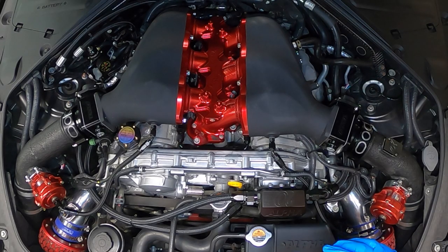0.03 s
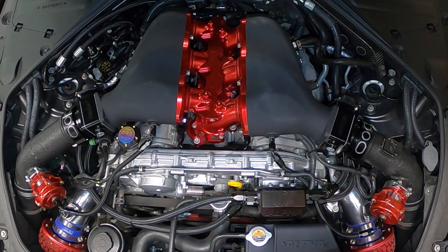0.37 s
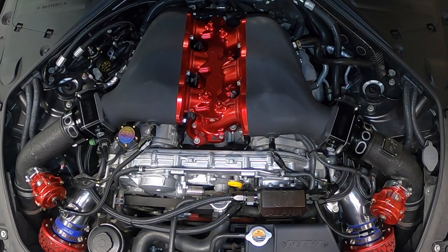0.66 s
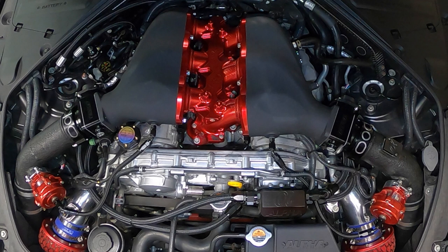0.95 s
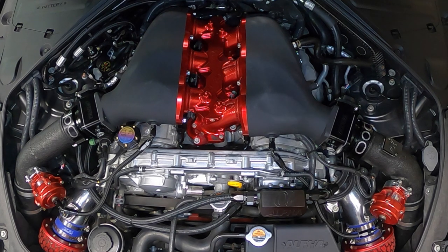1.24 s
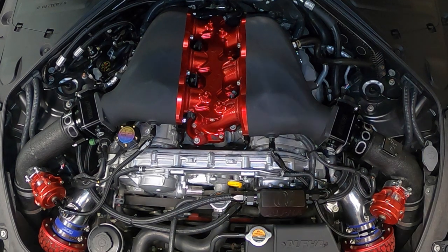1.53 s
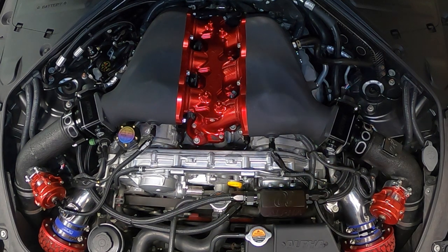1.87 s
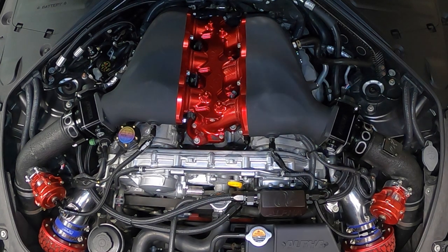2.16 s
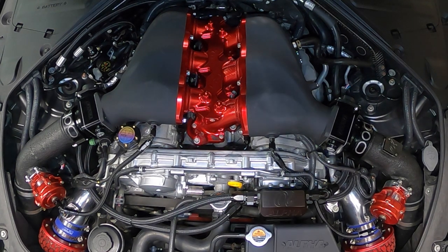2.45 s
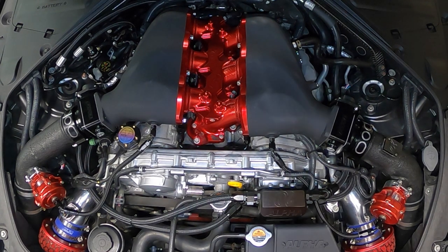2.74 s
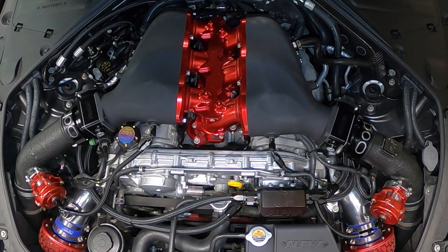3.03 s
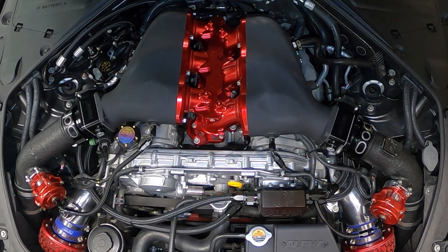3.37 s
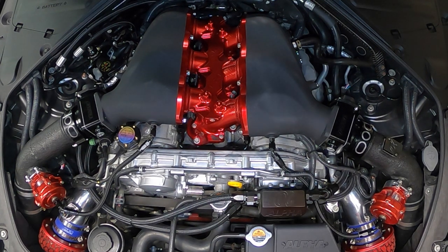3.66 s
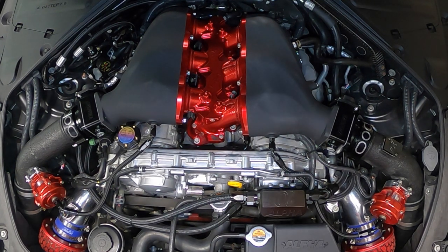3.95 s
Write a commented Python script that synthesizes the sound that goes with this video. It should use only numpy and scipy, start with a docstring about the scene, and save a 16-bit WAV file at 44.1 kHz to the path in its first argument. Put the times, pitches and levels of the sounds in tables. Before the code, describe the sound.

A cloth wipes softly in a car's engine bay, with dull bumps and small clicks.

```python
"""A garage, beside an open engine bay: someone moves about with a wiping cloth.
The cloth swishes in short strokes as its fibres slide and snag. A hollow body rings with dull thumps
when bumped and groans when rubbed; rubbed parts squeak briefly and small hard parts click.
Under it all the room rumbles and the ventilation hums faintly. The walls add a short, dull tail."""
import sys
import numpy as np
from scipy import signal
from scipy.fft import rfft, irfft
from scipy.io import wavfile

SR = 44100
rng = np.random.default_rng(int(sys.argv[2]) if len(sys.argv) > 2 else 0)


def materialize(psi):
    """Save the field psi as 16-bit PCM at rate SR to the path in sys.argv[1].

    A 1-D psi becomes a single channel; in a 2-D psi each row is a channel.
    """
    bounded = np.clip(np.atleast_2d(psi).T, -1, 1)
    quanta = np.round(bounded * 32767).astype(np.int16)
    wavfile.write(sys.argv[1], SR, quanta)


N = 176400
TIME_S, BIN_HZ = np.arange(N) / SR, np.fft.rfftfreq(N, 1 / SR)


def from_db(db):
    """Decibels to gain."""
    return 10 ** (np.asarray(db) / 20)


def rms_one(x):
    """Scale to unit power."""
    return x / np.sqrt(np.mean(x ** 2) + 1e-20)


def pan(db):
    """Left and right gains; positive dB leans left."""
    return from_db(np.array([[db], [-db]]) / 2)


def equalise(x, curve):
    """Apply an EQ curve drawn on a log-frequency axis."""
    hz, db = np.transpose(curve)
    return irfft(rfft(x) * from_db(np.interp(np.log(BIN_HZ + 1e-9), np.log(hz), db)), N)


def colour(x, curve):
    """EQ a noise and bring it to unit power."""
    return rms_one(equalise(x, curve))


def lowpass(x, hz, order):
    """Butterworth low-pass."""
    return signal.sosfilt(signal.butter(order, hz, fs=SR, output="sos"), x + 1e-18)


def resonance(x, hz, width):
    """Band-pass with gain 1 at its peak; width as a share of its pitch."""
    r = np.exp(-np.pi * hz * width / SR)
    feedback = [1, -2 * r * np.cos(2 * np.pi * hz / SR), r * r]
    return signal.lfilter(np.array([1, 0, -1]) * (1 - r * r) / 2, feedback, x + 1e-18)


def focus(x, hz, width):
    """Two resonances in series, for steeper skirts."""
    return resonance(resonance(x, hz, width), hz, width)


def envelope(start, length, attack, release):
    """Smooth rise centred on the start, hold, dying release; all in seconds."""
    t = TIME_S - start
    rise = np.sin(np.clip(t / attack + .5, 0, 1) * np.pi / 2) ** 2
    return rise * np.exp(-np.maximum(t - length, 0) / release)


def drift(rate_hz):
    """Smooth random wander of spread 1."""
    return rms_one(irfft(rfft(rng.standard_normal(N)) / (1 + (BIN_HZ / rate_hz) ** 2), N))


def grains(per_s, spread_db):
    """Random tiny impacts, all one size at a spread of 0 dB; unit power."""
    sizes = from_db(spread_db * np.minimum(rng.exponential(1, N), 4)) * rng.choice([-1, 1], N)
    return rms_one(sizes * (rng.random(N) < per_s / SR))


# Stereo width, as EQ on the side signal: freq_hz, gain_db
SIDE_EQ = [(50, -23.5), (260, -7), (1000, -5), (7000, -2), (12000, -0.5)]
def spread(mid, side):
    """Stereo from two unrelated signals, wider towards the treble."""
    side = equalise(side, SIDE_EQ)
    return np.array([mid + side, mid - side])


def noise():
    """Stereo noise, close to white."""
    return spread(*rng.standard_normal((2, N)))


# Tone of the room's air: freq_hz, gain_db
RUMBLE_EQ = [(24, -7), (45, 4), (140, -14.5), (235, -20.5), (320, -24), (500, -32), (800, -40.5),
             (1250, -32), (1900, -48), (3000, -51), (7000, -55), (10000, -66), (15000, -69)]
# Fader ride on the rumble's bass: time_s, gain_db
BASS_RIDE = [(.35, -3.5), (.55, -0.5), (1.1, 1.5), (2.4, -0.5), (3.0, -11), (3.23, 4), (3.42, -18.5),
             (3.52, -2), (3.9, -0.5)]
def room_rumble():
    """A bed of dark air noise whose bass swells and dips."""
    split_hz = 182
    air = colour(noise(), RUMBLE_EQ)
    bass = irfft(rfft(air) / (1 + (BIN_HZ / split_hz) ** 2) ** 2, N)
    swell_db = np.interp(TIME_S, *np.transpose(BASS_RIDE)) + 3 * drift(rate_hz=6.5)
    return from_db(-52.5) * (air + bass * (from_db(swell_db) - 1)) * pan(db=0.5)


# Tones of the ventilation: pitch_hz, level_db
HUM_TONES = [(232, -71), (479.7, -83)]
def ventilation_hum():
    """Faint tones, each wavering in level and phase."""
    out = 0
    for hz, db in HUM_TONES:
        waver = from_db(2.5 * drift(rate_hz=9.7))
        tone = np.sin(2 * np.pi * hz * TIME_S + .5 * drift(rate_hz=12))
        out = out + from_db(db) * rms_one(waver * tone)
    return out


def garage_reverb(x):
    """A dull, diffuse tail from the walls."""
    t60_s, predelay_s = 0.45, 0.008
    decay = from_db(-60 * TIME_S / t60_s) * (TIME_S > predelay_s)
    tail = lowpass(noise() * decay, hz=4040, order=1)[:, :SR]
    return signal.fftconvolve(x, rms_one(tail) / np.sqrt(SR), axes=1)[:, :N]


def cloth_crackle():
    """Sparse bright ticks as the cloth is handled lightly."""
    decay_s = 0.0019
    impacts = np.abs(grains(per_s=160, spread_db=4.5))
    puffs = signal.lfilter([1], [1, -np.exp(-1 / (decay_s * SR))], impacts + 1e-18)
    ticks = lowpass(resonance(puffs * noise(), hz=6800, width=0.42), hz=8000, order=8)
    return from_db(-86) * envelope(start=1.89, length=0.68, attack=0.023, release=0.023) * rms_one(ticks)


# Rubbed parts that sing: start_s, length_s, level_db, pitch_hz
SQUEAK_CUES = [(0.112, 0.25, -85.5, 4150), (0.617, 0.14, -56, 181), (1.194, 0.03, -59.5, 511),
               (1.203, 0.0091, -63, 1505), (2.993, 0.085, -78, 5750), (2.995, 0.087, -75, 3350)]
def squeaks():
    """For a moment the slips of a rubbed part fall into one pitch."""
    slips, out = noise(), 0
    for start, length, db, hz in SQUEAK_CUES:
        tone = rms_one(focus(slips, hz, width=0.13))
        out = out + from_db(db) * envelope(start, length, attack=0.0045, release=0.018) * tone
    return out


# Dry scuffs: start_s, length_s, level_db
SCUFF_CUES = [(1.165, 0.019, -60), (1.38, 0.019, -66.5), (1.459, 0.031, -63.5), (1.993, 0.054, -74),
              (3.635, 0.064, -68)]
# Their mid-heavy tone: freq_hz, gain_db
SCUFF_EQ = [(250, -18.5), (560, 9), (850, 10.5), (1400, 8), (2100, 0), (6000, -29.5)]
def scuffs():
    """Short gritty scrapes at the moments of contact."""
    level = sum(from_db(db) * envelope(start, length, attack=0.01, release=0.013)
                for start, length, db in SCUFF_CUES)
    grit = spread(grains(per_s=1200, spread_db=-0.5), rng.standard_normal(N))
    return level * colour(grit, SCUFF_EQ)


# Taps on small hard parts: start_s, level_db, pitch_hz
CLICK_CUES = [(1.1613, -49, 2430), (1.166, -48.5, 6800), (1.461, -51.5, 4530), (1.478, -42.5, 4560),
              (2.9178, -53, 4240), (2.9512, -53.5, 7100), (2.994, -49, 3220), (3.016, -56, 5600),
              (3.057, -52.5, 3540), (3.0678, -54, 3340), (3.072, -55.5, 7200), (3.155, -52.5, 3150)]
# Resonances all the parts share: pitch_hz, gain_db, width_ratio (bandwidth over pitch)
PART_MODES = [(1295, 5.5, 0.073), (2500, -2.5, 0.08), (4770, -7.5, 0.068), (7200, -13, 0.22)]
# Tone of the crack: freq_hz, gain_db
CRACK_EQ = [(400, 13.5), (4700, 12.5), (7400, 11), (9000, -8), (14000, -47)]
def clicks():
    """A sharp tap rings a small part; a crack and a faint tail go with it."""
    crack, out = colour(noise(), CRACK_EQ), 0
    for start, db, hz in CLICK_CUES:
        tap = 1. * (np.arange(N) == int(start * SR))
        shared_ring = sum(from_db(mode_db) * resonance(tap, mode_hz, width) * (-1) ** k
                          for k, (mode_hz, mode_db, width) in enumerate(PART_MODES))
        own_ring = 2 * from_db(-1) * resonance(tap, hz, width=0.14)
        ring = lowpass(shared_ring + own_ring, hz=8000, order=8)
        snap = from_db(-21.5) * envelope(start, 0, attack=.0004, release=0.0019)
        tail = from_db(-17.5) * envelope(start, 0, attack=.0004, release=0.0075)
        out = out + from_db(db) * (ring / np.abs(ring).max() + (snap + tail) * crack)
    return out


# Modes of the hollow body: pitch_hz, gain_db, t60_s
BODY_MODES = [(62, 2.5, 0.14), (111.5, -0.5, 0.13), (126, -3.5, 0.18), (207, 2.5, 0.093), (252, -2.5, 0.25),
              (274.4, -3, 0.27), (378.4, -9.5, 0.11), (511, -8.5, 0.087), (556, -9.5, 0.099),
              (767, -12, 0.16), (1426, -11.5, 0.061)]
def body_ring():
    """The hollow body's dying ring after a single tap."""
    t = TIME_S[:SR // 2]
    return sum(from_db(db - 60 * t / t60) * np.cos(2 * np.pi * hz * t) for hz, db, t60 in BODY_MODES)


# Rubs on the body: start_s, length_s, level_db, pitch_hz
RUB_CUES = [(1.164, 0.047, -47.5, 252), (1.265, 0.16, -57, 268), (1.403, 0.11, -55.5, 282),
            (1.452, 0.06, -44, 134.3), (1.585, 0.064, -51.5, 72), (1.684, 0.064, -58, 264),
            (1.919, 0.17, -47, 88), (1.964, 0.06, -51, 226), (2.065, 0.076, -53.5, 112.5)]
def rubs():
    """Dense stick and slip makes the body groan, with some direct friction mixed in."""
    slips_per_s, width = 1300, 0.45
    slips = spread(grains(slips_per_s, spread_db=0), from_db(-7.5) * grains(slips_per_s, spread_db=0))
    ringing, out = signal.fftconvolve(slips, body_ring()[None], axes=1)[:, :N], 0
    for start, length, db, hz in RUB_CUES:
        friction = rms_one(focus(slips, hz, width))
        hollow = rms_one(resonance(resonance(ringing, hz, width), hz, width=1.93))
        groan = rms_one(hollow + from_db(-6.5) * friction)
        out = out + from_db(db) * envelope(start, length, attack=0.013, release=0.022) * groan
    return out


# Bumps on the body: start_s, level_db (of half the peak), pitch_hz
BUMP_CUES = [(1.163, -40.5, 215), (1.166, -39.5, 62), (1.204, -41.5, 122.5), (1.219, -44.5, 235),
             (1.403, -44, 263), (1.411, -43.5, 120), (1.429, -49, 292), (1.475, -49, 143), (1.573, -47, 71),
             (1.578, -57, 513), (1.975, -40, 100.5), (2.002, -50, 264), (2.021, -33, 85.3),
             (2.028, -46.5, 211), (2.036, -52, 420), (3.673, -57, 910)]
def bumps():
    """Soft contacts set the body ringing, each around its own pitch."""
    out, ring = np.zeros(N + SR), body_ring()
    for start, db, hz in BUMP_CUES:
        thump = focus(ring, hz, width=0.6)
        onset = int(start * SR)
        out[onset:onset + len(thump)] += 2 * from_db(db) * thump / np.abs(thump).max()
    return out[:N]


# Wiping strokes: start_s, length_s, swish_gain_db, sheen_gain_db, low_cut_hz
STROKE_CUES = [(0.0, 0.08, -73, -92, 1510), (0.112, 0.29, -84, -100, 2500),
               (0.565, 0.095, -67.5, -87, 1400), (0.631, 0.012, -72.5, -97, 1420),
               (0.679, 0.14, -67.5, -82, 710), (0.802, 0.0057, -67, -80, 2930),
               (0.884, 0.046, -66, -80, 3630), (0.912, 0.18, -77.5, -95.5, 3770),
               (1.174, 0.057, -67.5, -95, 700), (1.184, 0.0068, -77, -66.5, 4020),
               (1.249, 0.11, -73, -85.5, 3720), (1.95, 0.079, -75.5, -89, 3700),
               (2.302, 0.05, -76.5, -87, 4040), (2.43, 0.16, -85.5, -100, 3550),
               (2.792, 0.15, -80.5, -96, 2000), (2.946, 0.14, -77.5, -87, 2200),
               (3.118, 0.15, -77.5, -105, 2200), (3.525, 0.2, -71.5, -92, 2000),
               (3.799, .12, -73, -98, 2320), (3.937, .06, -71.5, -88, 2800)]
# Tone of the sliding fibres: freq_hz, gain_db
FIBRE_EQ = [(700, -3.5), (1400, 1.5), (2100, -4.5), (3100, -0.5), (4700, 2), (6200, 0), (7500, -1),
            (9000, -10.5), (12000, -26.5)]
# Sheen, the fine hiss on top: freq_hz, gain_db
SHEEN_EQ = [(5000, -46), (7000, 12.5), (10000, 14), (13000, 4), (15500, -7.5)]
def cloth_strokes():
    """Sliding fibres hiss and snag; each stroke has its own low cut, and the pressure flutters."""
    fibres = colour(noise() + from_db(-2.5) * grains(per_s=970, spread_db=-10.5), FIBRE_EQ)
    sheen, out = colour(noise(), SHEEN_EQ), 0
    for start, length, swish_db, sheen_db, low_cut_hz in STROKE_CUES:
        swish = signal.sosfilt(signal.butter(3, low_cut_hz, "high", fs=SR, output="sos"), fibres)
        pressure = envelope(start, length, attack=0.61 * length, release=0.023)
        out = out + pressure * (from_db(swish_db) * swish + from_db(sheen_db) * sheen)
    flutter_db = 0.5 * drift(rate_hz=59)
    return from_db(flutter_db) * out


def scene():
    """Close handling a little to the left, with garage reverb, over the room tone."""
    body = (bumps() + rubs() + squeaks()) * pan(db=1.5)
    wiping = (cloth_strokes() + scuffs() + cloth_crackle()) * pan(db=3)
    near = body + wiping + clicks() * pan(db=5)
    return near + from_db(-15) * garage_reverb(near) + ventilation_hum() + room_rumble()


def record(dry):
    """Master EQ: the deepest bass and the very top are cut."""
    low_cut_hz, high_cut_hz = 14, 15300
    dry = signal.sosfilt(signal.butter(2, low_cut_hz, "high", fs=SR, output="sos"), dry)
    return signal.sosfilt(signal.ellip(10, .1, 70, high_cut_hz, fs=SR, output="sos"), dry)


dry = scene()
out = record(dry)
materialize(out)
```